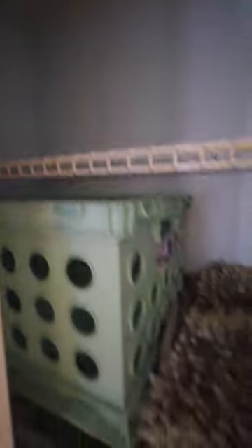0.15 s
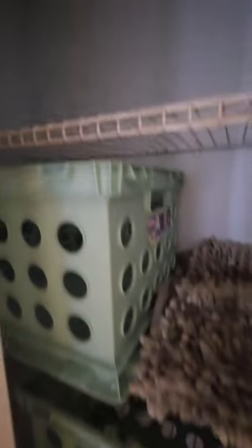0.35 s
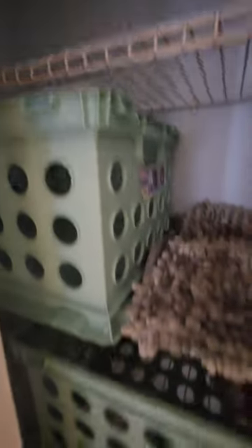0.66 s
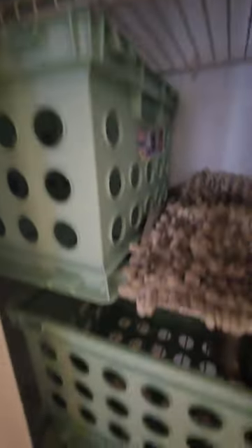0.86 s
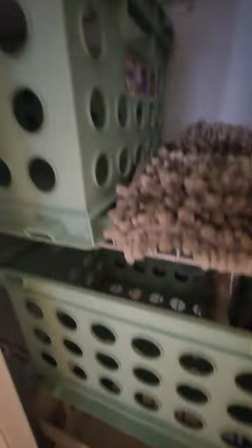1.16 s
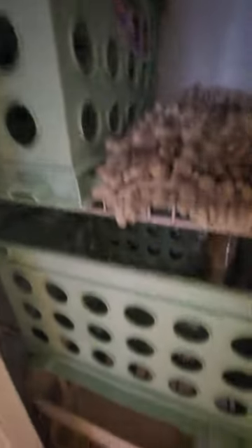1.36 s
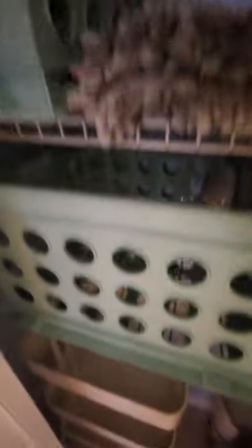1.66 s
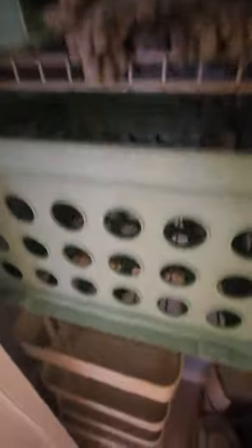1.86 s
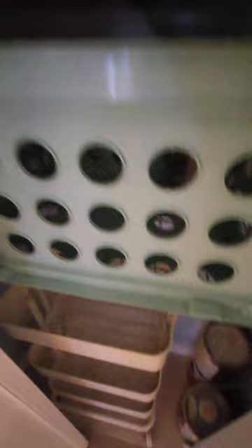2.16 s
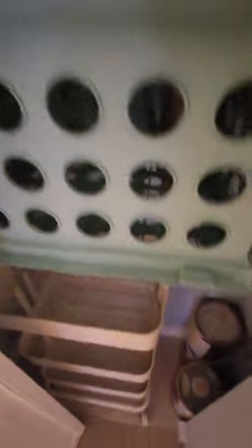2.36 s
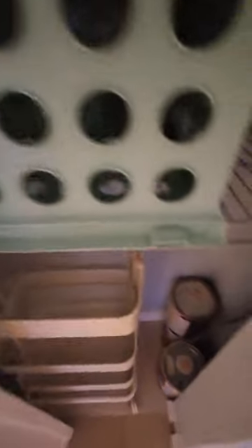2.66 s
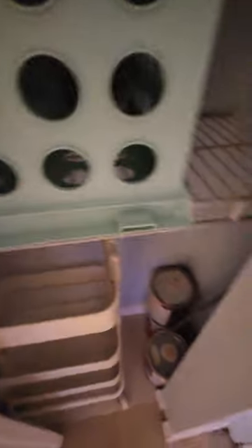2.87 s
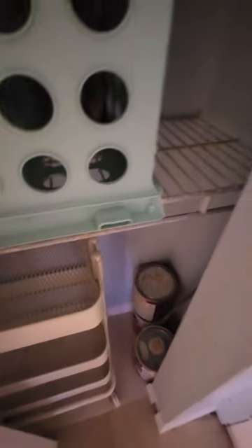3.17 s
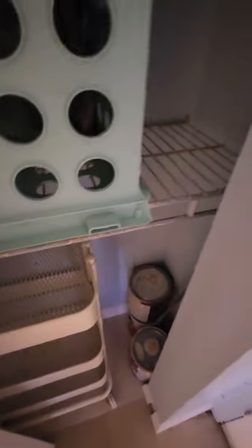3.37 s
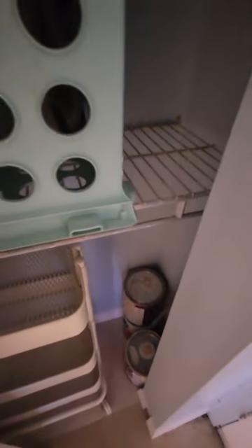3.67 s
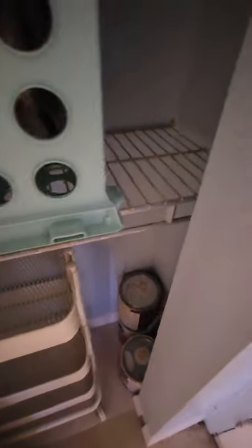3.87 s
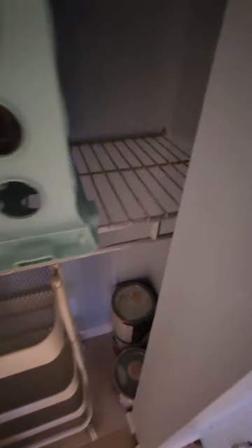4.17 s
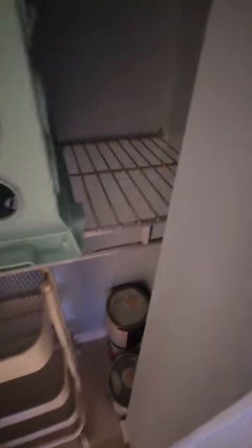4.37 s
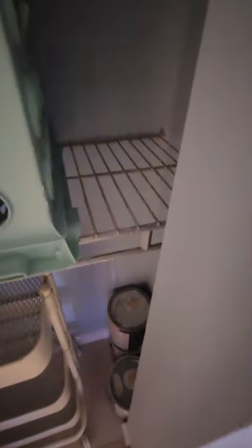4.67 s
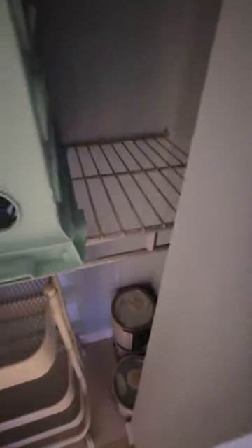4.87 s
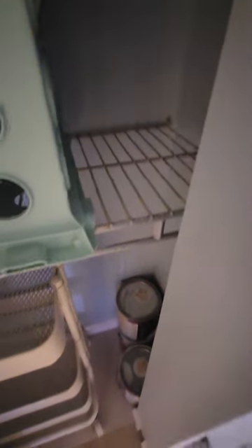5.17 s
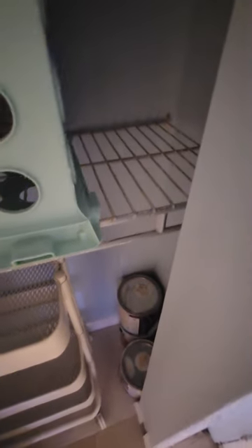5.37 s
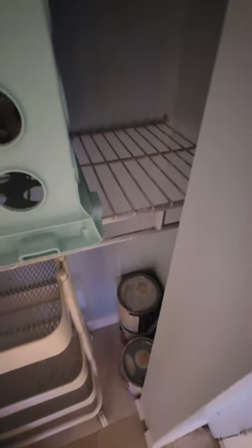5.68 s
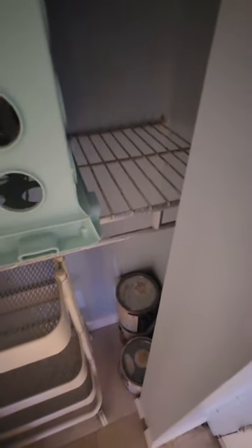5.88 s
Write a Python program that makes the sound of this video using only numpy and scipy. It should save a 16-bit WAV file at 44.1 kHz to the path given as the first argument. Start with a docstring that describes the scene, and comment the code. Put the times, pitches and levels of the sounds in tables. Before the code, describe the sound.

Close phone pickup inside a home closet: steady deep air rumble and motor hum throughout, with a low drone slowly growing. Faint scuffs and dry hinge ticks lead into one smooth sliding hiss of a folding door, then hollow scrapes and clicks. A sudden loud double-edged wooden knock clatters and rings in the small space, followed by weak thuds and a last light scrape over the rumble.

```python
"""A steady ventilation rumble and hum fill a small room; over them a folding closet door is eased open.
Hinges tick as short resonances, and the guide hisses along its track as noise that follows its speed.
The panels knock against their stop: a thump, ringing modes, a room tail and a noise rattle.
A few soft bumps and a last scuff follow.
"""
import sys
import numpy as np
from scipy import signal
from scipy.fft import rfft, irfft, next_fast_len
from scipy.io import wavfile
from scipy.ndimage import uniform_filter1d, minimum_filter1d

SR = 44100
rng = np.random.default_rng(int(sys.argv[2]) if len(sys.argv) > 2 else 0)


def materialize(psi):
    """Save the field psi as 16-bit PCM at rate SR to the path in sys.argv[1].

    A 1-D psi becomes a single channel; in a 2-D psi each row is a channel.
    """
    bounded = np.clip(np.atleast_2d(psi).T, -1, 1)
    quanta = np.round(bounded * 32767).astype(np.int16)
    wavfile.write(sys.argv[1], SR, quanta)


N = 265041


def amp(db):
    """Decibels to gain."""
    return 10 ** (np.asarray(db) / 20)


def unit(x):
    """Scale to rms 1."""
    return x / np.sqrt(np.mean(x ** 2) + 1e-20)


def along(points, hz):
    """Interpolate (Hz, value) points on a log frequency axis."""
    point_hz, value = np.transpose(points)
    return np.interp(np.log(hz + 1), np.log(point_hz + 1), value)


def filtered(x, response):
    """Apply a complex response of frequency to x."""
    n = x.shape[-1]
    padded = next_fast_len(n + SR // 2)
    spectrum = rfft(x, padded) * response(np.fft.rfftfreq(padded, 1 / SR))
    return irfft(spectrum, padded)[..., :n]


def resonance(f, hz, width_hz):
    """Causal response of one damped mode."""
    return 1j * f * width_hz / (hz * hz - f * f + 1j * f * width_hz)


def lowpass(f, hz):
    """Causal response falling 12 dB an octave above hz."""
    return 1 / (1 + 1j * np.sqrt(2) * f / hz - (f / hz) ** 2)


def fade(t, t60_s):
    """Exponential decay, 60 dB in t60_s."""
    return np.exp(-np.log(1000) * t / t60_s)


def swell(t, half_length_s):
    """Gaussian rise and fall around t = 0, down to 1/e at half_length_s."""
    return np.exp(-(t / half_length_s) ** 2)


# diffuse field likeness: frequency_hz, left_right_correlation [-1..1]
LIKENESS = [(60, 1), (130, 0.82), (290, 0.99), (640, 0.51), (1400, -0.24), (3000, -0.024)]


def noise(gain, size=N):
    """Diffuse stereo noise of rms 1: mostly shared in the bass, nearly unrelated in the treble."""
    def mid_side(f):
        angle = np.arccos(np.clip(along(LIKENESS, f), -1, 1)) / 2
        return gain(f) * np.array([np.cos(angle), np.sin(angle)])

    mid, side = filtered(rng.standard_normal((2, size)), mid_side)
    return unit(np.array([mid + side, mid - side]))


def coloured(points, size=N):
    """Diffuse noise with a given spectrum."""
    return noise(lambda f: amp(along(points, f)), size)


def roughness(size, depth_db):
    """A gain of rms 1 that flutters over a few milliseconds, as tiny slips and contacts do."""
    flutter = unit(uniform_filter1d(rng.standard_normal(size), size=130))
    return unit(amp(depth_db * flutter))


def add(track, start_s, sound):
    """Mix a sound in at start_s, cut at the track's end."""
    part = track[:, round(start_s * SR):][:, :sound.shape[-1]]
    part += sound[..., :part.shape[-1]]


# panels striking the stop and each other: start_s, force_db, contact_ms, shake_db (hardware rattle)
PANEL_KNOCKS = [(5.193, 0, 0.063, -21.5), (5.197, 2, 1.04, -32), (5.2093, -4.5, 1.3, -30),
                (5.2268, -29, 0.31, -23.5), (5.24, -39, 0.32, -26), (5.2502, -11.5, 2.5, -46),
                (5.2652, 0, 2.25, -51), (5.292, -10.5, 3.1, -42), (5.392, -17.5, 2.1, -62),
                (5.723, -24.5, 1.8, -80), (5.846, -27, 1.5, -65)]
# the blow itself, panel modes: frequency_hz, width_hz, level_db
PANEL_MODES = [(89, 17, -8.5), (167, 35, -2), (302, 60, -10.5), (525, 75, -19), (636.4, 31, 1),
               (1273, 86, -4), (1430, 66, -21)]
# door and closet ringing on: frequency_hz, level_db, t60_s
RING_MODES = [(91.5, -5, .9), (171.3, 0, 1.15), (193, -4, .5), (254, -9, .55), (278, -7, .45),
              (321, -8, .4), (392, -9, .5), (417, -8, .4), (482, -4, .55), (532, 0, .4), (564, -2, .34),
              (623.5, 2, .38), (664, -2, .28), (678.6, -2, .28), (731, -12, .27), (890, -12, .25),
              (1213, -8, .28), (1340, -8, .26), (1519, -8, .28), (2315, -15, .25)]
# hardware rattle spectrum: frequency_hz, density_db [dB per Hz, relative]
RATTLE_SPECTRUM = [(600, -24), (1500, 7.5), (3800, 1.5), (5200, -2), (8000, -9), (10000, -11), (15500, -17)]


def door(blow_db=39, ring_db=-26, room_db=-22, rattle_db=-8, rattle_t60_s=0.19, crack_gain=1.3,
         wood_hz=1700, lag_ms=0.55, chatter_db=2):
    """Each contact thumps the panels, sets door and closet ringing and shakes the hardware."""
    out, t = np.zeros((2, N)), np.arange(SR) / SR

    def panel_response(f):
        modes = sum(amp(db) * resonance(f, hz, width_hz) for hz, width_hz, db in PANEL_MODES)
        return lowpass(f, wood_hz) * modes  # wood soaks up its own treble

    def ports(f):
        # the left port is nearer; long waves reach both alike
        lag_s = lag_ms / 1000 * f ** 2 / (f ** 2 + 350 ** 2)
        return np.array([np.ones(len(f)), np.exp(-2j * np.pi * f * lag_s)])

    impulse = 1. * (t == 0)
    blow = filtered(impulse, panel_response)
    for start_s, force_db, contact_ms, shake_db in PANEL_KNOCKS:
        # random mode phases, so the rings of successive contacts add in energy
        ring = sum(amp(level_db) * fade(t, t60_s) * np.sin(2 * np.pi * (hz * t + rng.random()))
                   for hz, level_db, t60_s in RING_MODES)
        ring = ring * (1 - np.exp(-t / 0.0011))
        direct = filtered(amp(blow_db) * blow + amp(ring_db) * ring, ports)
        wood = direct + amp(room_db) * room_tail(SR)
        # a longer, softer contact excites less treble
        wood = filtered(wood, lambda f: lowpass(f, 1000 / contact_ms))
        shaking = roughness(SR, chatter_db) * fade(t, rattle_t60_s)
        crack = crack_gain * fade(t, 0.0035)
        rattle = coloured(RATTLE_SPECTRUM, SR) * (shaking + crack)
        add(out, start_s, amp(force_db) * wood + amp(shake_db + rattle_db) * rattle)
    return out


# the room's answer: frequency_hz, density_db [dB per Hz, relative]
ROOM_SPECTRUM = [(30, -29), (55, -5.5), (100, -9), (135, -10.5), (175, -4.5), (230, -19.5), (330, -18),
                 (450, -8.5), (620, -5), (800, -15), (1100, -14), (1500, -24), (2100, -24), (6000, -63)]
# the room's decay: frequency_hz, t60_s
ROOM_DECAY = [(80, 1), (170, 1), (500, 0.37), (1400, 0.4), (4000, 0.49), (12000, .2)]


def room_tail(size):
    """The room's answer to a blow: noise whose bass rings longest."""
    hz, t, bins = signal.stft(coloured(ROOM_SPECTRUM, size), SR, nperseg=512)
    decay = fade(t, along(ROOM_DECAY, hz)[:, None])
    tail = signal.istft(bins * decay, SR, nperseg=512)[1][:, :size]
    return tail * (1 - np.exp(-np.arange(size) / SR / 0.0017))


# guide rub and hiss spectra: frequency_hz, density_db [dB per Hz, relative]
RUB_SPECTRUM = [(450, -20), (950, 3), (1250, 1.5), (1600, 1.5), (2800, 2), (4200, 0), (7000, -15.5)]
HISS_SPECTRUM = [(2500, -27), (4800, 3.5), (8200, 1), (11500, -2.5), (15500, -3.5)]
# short scuffs as the door is nudged: centre_s, level_db, half_length_s
GUIDE_SCUFFS = [(2.55, -65, 0.07), (2.712, -57, 0.031), (2.85, -65, .06), (4.745, -51.5, 0.012),
                (4.847, -48, 0.14), (4.89, -48, 0.016), (5.022, -50.5, 0.018), (5.057, -53.5, 0.15),
                (5.413, -53.5, 0.058), (5.927, -54.5, 0.13)]
# the door dragging harder for a moment, and at 5.844 s a short hinge groan: centre_s, level_db, pitch_hz,
# width_hz, half_length_s
DOOR_SCRAPES = [(2.709, -53, 5600, 4000, 0.038), (3.595, -48, 2700, 2900, 0.12),
                (3.815, -53, 1040, 520, 0.072), (4.78, -43.5, 268, 260, .07), (4.927, -47.5, 323, 220, 0.1),
                (5.844, -44, 357, 13, 0.067)]
# the one long glide gathers speed, peaks and coasts out
GLIDE_PEAK_S, GLIDE_RISE_S, GLIDE_FALL_S = 3.928, 0.67, 0.88
GLIDE_RUB_DB, GLIDE_HISS_DB = -45, -46
RUB_EXPONENT, HISS_EXPONENT = 1.22, 1  # amplitude as a power of speed
SCUFF_RUB_DB = -7  # a light scuff is more hiss than rub


def slide(grain_db=1.2):
    """The guide rubs and hisses with its speed, in one glide and short scuffs; at times it scrapes hollowly,
    and once a hinge groans briefly."""
    t = np.arange(N) / SR
    ramp_s = np.where(t < GLIDE_PEAK_S, GLIDE_RISE_S, GLIDE_FALL_S)
    speed = np.maximum(1 - np.abs((t - GLIDE_PEAK_S) / ramp_s), 0)
    scuffs = sum(amp(level_db) * swell(t - centre_s, half_length_s)
                 for centre_s, level_db, half_length_s in GUIDE_SCUFFS)
    rub = amp(GLIDE_RUB_DB) * speed ** RUB_EXPONENT + amp(SCUFF_RUB_DB) * scuffs
    hiss = amp(GLIDE_HISS_DB) * speed ** HISS_EXPONENT + scuffs
    out = rub * coloured(RUB_SPECTRUM) + hiss * coloured(HISS_SPECTRUM)
    for centre_s, level_db, pitch_hz, width_hz, half_length_s in DOOR_SCRAPES:
        scrape = noise(lambda f: resonance(f, pitch_hz, width_hz) ** 2)
        out += amp(level_db) * swell(t - centre_s, half_length_s) * scrape
    return roughness(N, grain_db) * out


# hinges and pivots catching: start_s, level_db, pitch_hz, t60_s
HINGE_TICKS = [(2.8, -39, 3040, 0.014), (3.379, -36, 5800, 0.024), (3.432, -55, 5500, .04),
               (4.292, -43, 1200, .08), (4.652, -48, 8750, 0.045), (4.732, -47.5, 1730, 0.088),
               (4.874, -46, 2030, 0.14), (5, -53.5, 1900, 0.11)]


def ticks(width_ratio=0.57, echo_db=-18):
    """Small catches of the hinges: noise in one broad resonance each, with a faint slower decay as echo."""
    out, t = np.zeros((2, N)), np.arange(SR // 2) / SR
    for start_s, level_db, pitch_hz, t60_s in HINGE_TICKS:
        burst = noise(lambda f: resonance(f, pitch_hz, width_ratio * pitch_hz) ** 2, len(t))
        decay = fade(t, t60_s) + amp(echo_db) * fade(t, 0.41)
        add(out, start_s, amp(level_db) * burst * decay)
    return out


# duct rumble and moving air spectra: frequency_hz, density_db [dB per Hz, relative]
DUCT_SPECTRUM = [(15, -42), (28, -9.5), (38, 0), (52, 3.5), (68, -4), (90, -10), (112, -20), (140, -21.5),
                 (230, -29.5), (400, -70.5)]
AIR_SPECTRUM = [(120, -32), (200, -4), (300, -2), (390, -1), (520, -4.5), (720, -9.5), (1000, -13.5),
                (1220, -15), (1600, -21), (2400, -22), (4400, -26.5), (8000, -33.5), (15500, -46)]
RUMBLE_DB = -34.5
# the drone grows as the microphone nears the closet
DRONE_FAR_DB, DRONE_NEAR_DB, APPROACH_S = -57.5, -47, 4.6


def ventilation(air_db=-49.0, hum_db=-45, hum_hz=119.5, drone_hz=172):
    """Duct rumble and moving air, a motor's hum, and the closet droning on one standing wave."""
    t = np.arange(N) / SR
    rumble = amp(RUMBLE_DB) * coloured(DUCT_SPECTRUM)
    air = amp(air_db) * coloured(AIR_SPECTRUM)
    hum = amp(hum_db) * np.sqrt(2) * np.sin(2 * np.pi * hum_hz * t)
    drone_db = np.interp(t, [0, APPROACH_S], [DRONE_FAR_DB, DRONE_NEAR_DB])
    drone = amp(drone_db) * noise(lambda f: resonance(f, drone_hz, 15.7) ** 2)
    return rumble + air + hum + drone


def walls(x, wall_db=-17, count=10):
    """Close walls and shelves send each port its own weak copies, which comb the mids and treble."""
    echoes = np.zeros((2, SR // 20))
    for port in echoes:
        # delays of 1 to 20 ms, random sign
        port[rng.integers(SR // 1000, SR // 50, count)] = rng.choice([-1, 1], count)
    copies = signal.fftconvolve(x, echoes, axes=1)[:, :N]
    highpass = lambda f: 1j * f / (400 + 1j * f)
    return x + amp(wall_db) * filtered(copies, highpass)


def scene():
    """Sum the sources, a little louder on the left; the knocks carry their own room tail."""
    balance_db = [[.9], [-.9]]
    return (door() + walls(ticks() + slide() + ventilation())) * amp(balance_db)


# colour of the microphone ports: frequency_hz, gain_db
PORT_COLOUR = [(4500, 0), (5500, -2), (6400, -2), (7400, 1.5), (8600, 1.5), (9300, -5.5), (10400, -4),
               (11500, 0.5), (13000, -1.5), (15800, -1)]
TOP_HZ = 15850


def record(dry):
    """The phone colours the treble, turns down the highest peaks and keeps nothing above its band limit."""
    heard = filtered(dry, lambda f: amp(along(PORT_COLOUR, f)))
    needed = np.minimum(1, .95 / (np.abs(heard).max(axis=0) + 1e-9))
    gain = uniform_filter1d(minimum_filter1d(needed, size=221), size=221)  # 5 ms windows
    return filtered(heard * gain, lambda f: f < TOP_HZ)


dry = scene()
out = record(dry)
materialize(out)
```